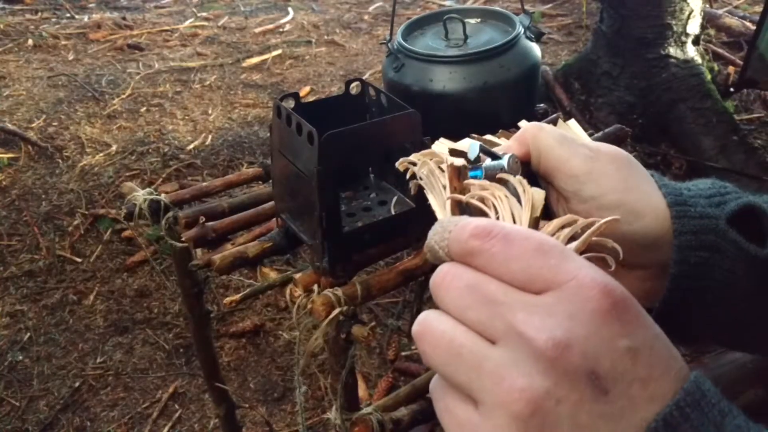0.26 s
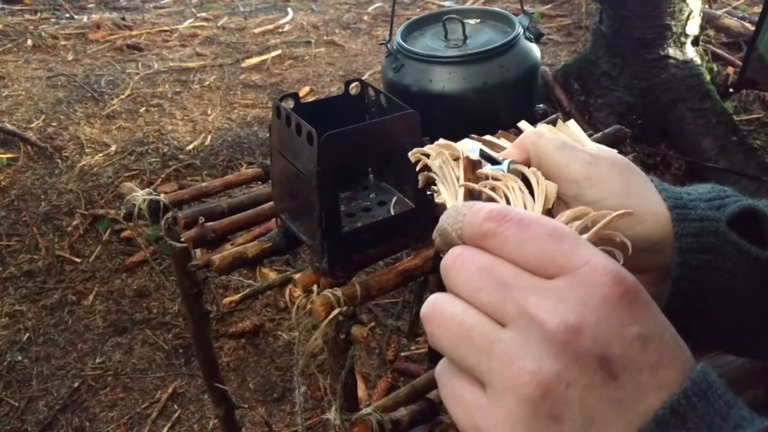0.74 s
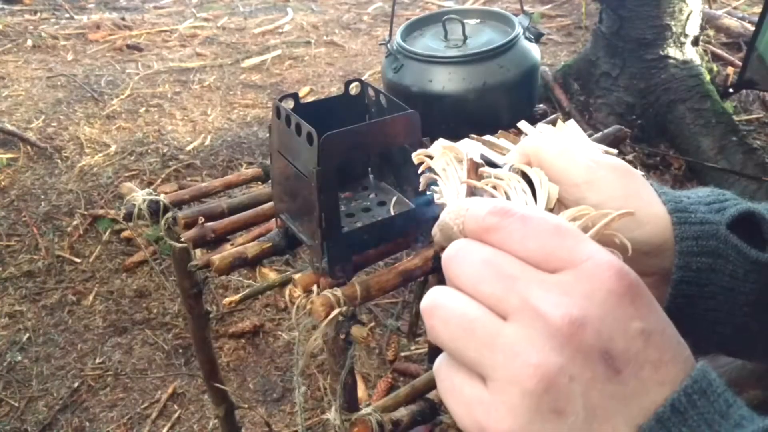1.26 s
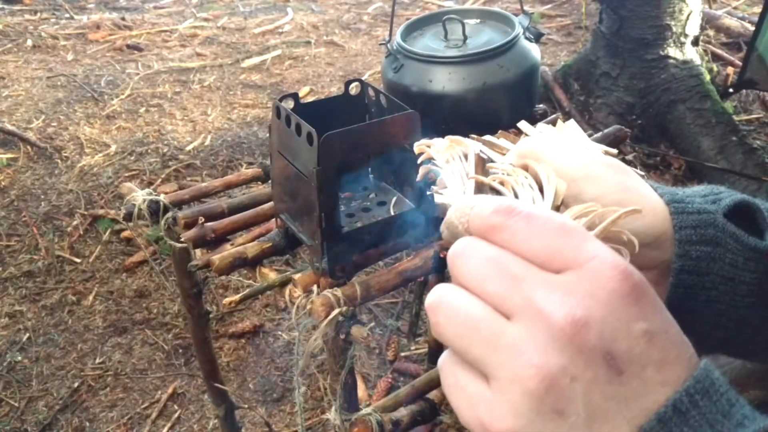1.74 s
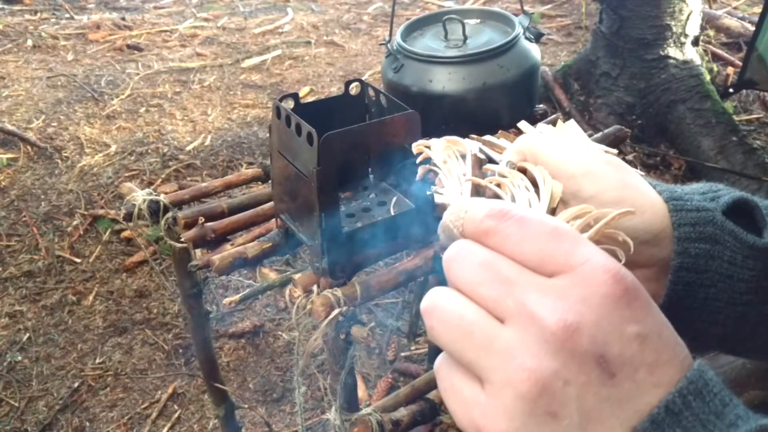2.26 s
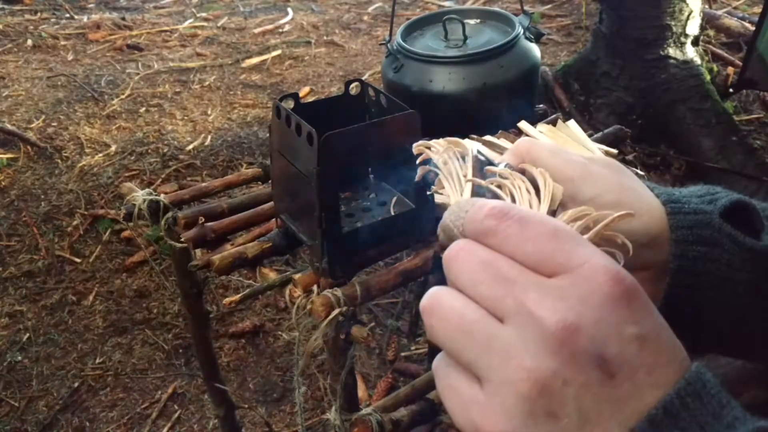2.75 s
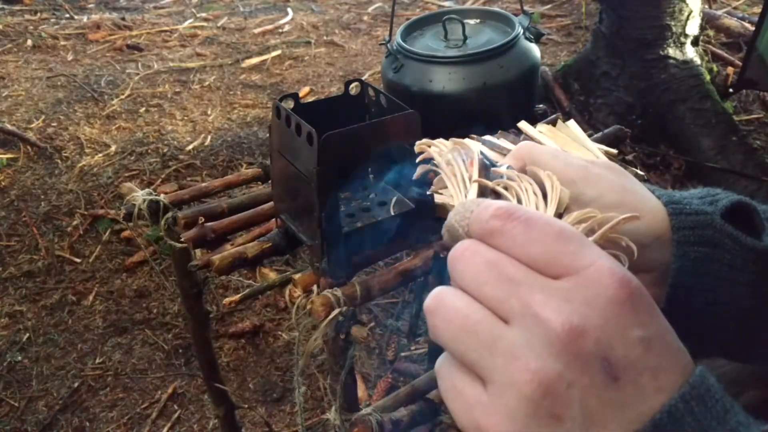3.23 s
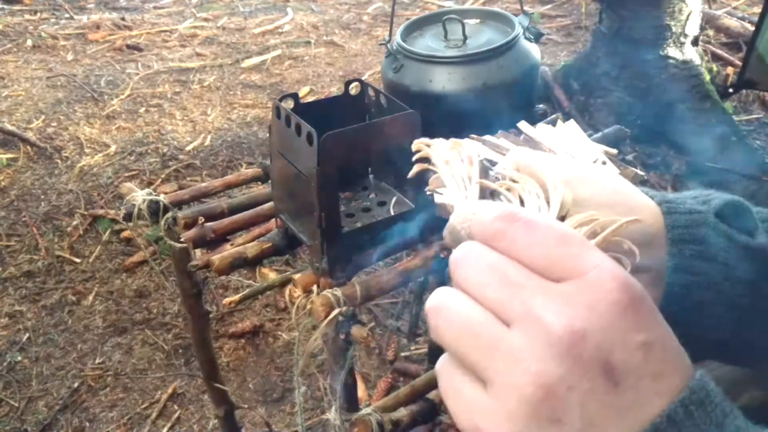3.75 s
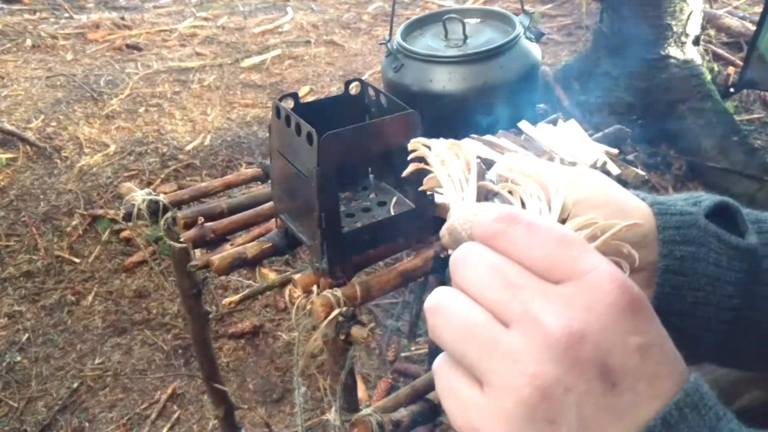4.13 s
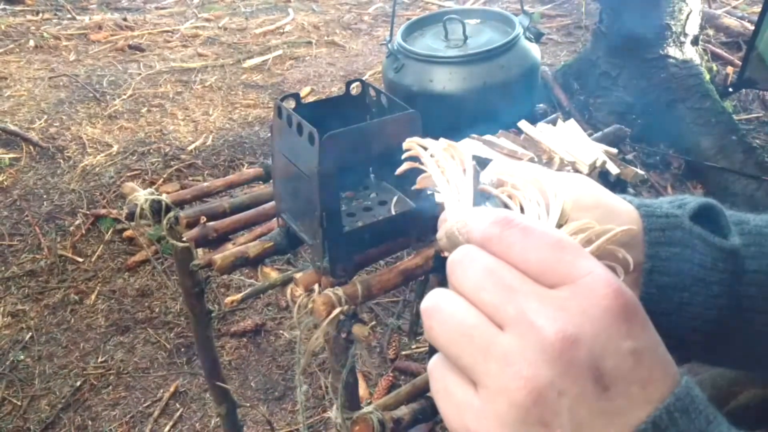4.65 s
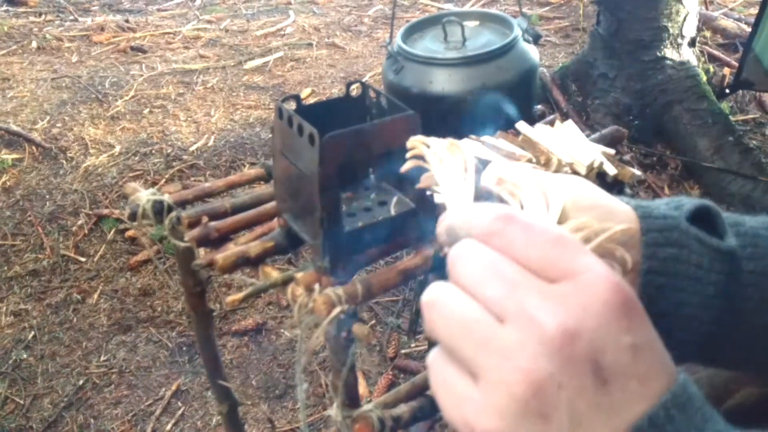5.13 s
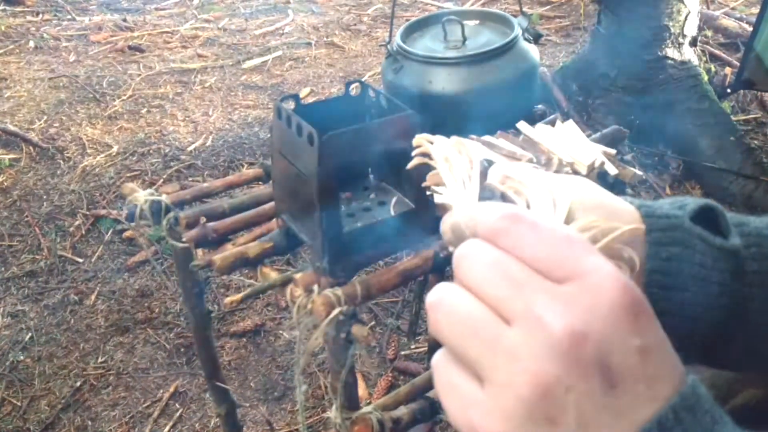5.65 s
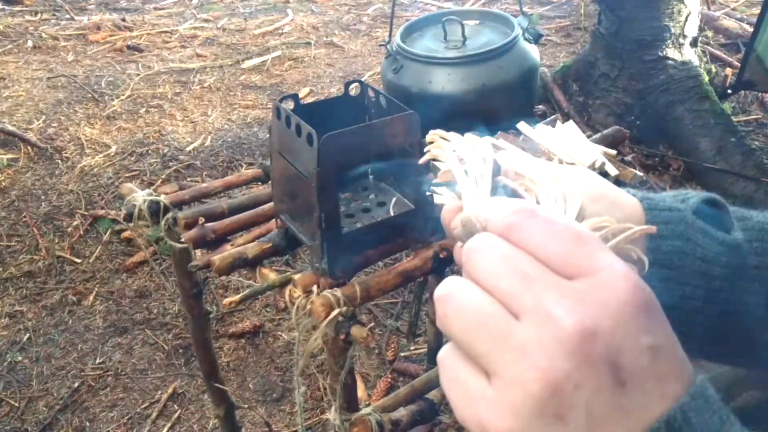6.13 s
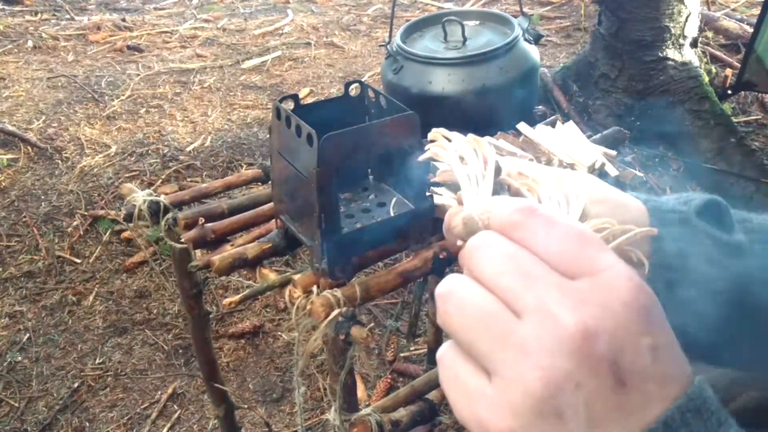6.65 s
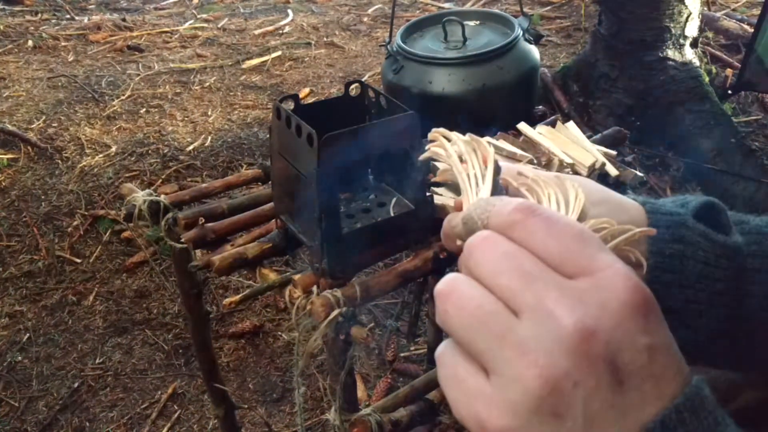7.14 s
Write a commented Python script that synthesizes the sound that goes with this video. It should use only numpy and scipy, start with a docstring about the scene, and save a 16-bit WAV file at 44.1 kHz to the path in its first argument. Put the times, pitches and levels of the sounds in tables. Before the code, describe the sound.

A quiet burning rush fades in as a gas flame meets a handful of moist shavings, then stays nearly even. Steam hisses and spits faintly over the breathy roar. Dry curls tick brightly and steam pockets pop with short hollow knocks, busiest from two to five seconds, sparse afterwards, until one prominent crack at the very end. Close microphones outdoors, wide image, little echo.

```python
"""A jet lighter's flame roars on a bunch of damp wood shavings, outdoors: filtered noise, fading in to about 2.5 s.
Steam pockets pop as pulses that ring the wood, each with a bright crack; thin curls tick as short noise splits.
Gas and steam hiss as reflected noise, and moisture sizzles as flurries of tiny noise spits.
Two close microphone ports hear it; each channel is one port minus the other, delayed, which spreads it wide."""
import sys
import numpy as np
from scipy import signal
from scipy.fft import rfft, irfft, next_fast_len
from scipy.io import wavfile
from scipy.ndimage import uniform_filter1d

SR = 44100
rng = np.random.default_rng(int(sys.argv[2]) if len(sys.argv) > 2 else 0)


def digitize_waveform(pressure):
    """Quantize a signal to 16-bit integers and store it at the path in sys.argv[1].

    Rows of a 2-D input are taken as channels; values are limited to [-1, 1].
    """
    field = np.atleast_2d(pressure).T
    bounded = np.clip(field, -1, 1)
    quanta = np.round(bounded * 32767).astype(np.int16)
    wavfile.write(sys.argv[1], SR, quanta)


N = 325899
BURST = 4096  # samples in a short sound
SCATTER_T60_S = .06

# share of the left port's direct sound that the right port hears alike, capped in use: hz, share (0-1)
ROAR_SHARE = [(100, 1), (300, 0.64), (450, 0.44), (850, 0.78), (1300, 0.63), (1700, 0.02), (8000, 0.19)]


def roar(flame_db):
    """Turbulent burning where the jet meets the shavings; it flutters as the flame licks round them."""
    # colour: hz, relative_db
    roar_colour = [(22, -18), (60, -6.5), (85, -7), (130, -5), (240, -5), (350, -3), (455, -10),
                   (560, -2.5), (690, -3.5), (820, 1), (1050, -3.5), (1520, -7), (1750, -11.5),
                   (2080, -11.5), (2300, -20.5), (3000, -20), (6000, -60)]
    # treble gain, duller for a while: time_s, gain_db
    treble_db = [(0, 0.5), (3.0, -0.5), (4.5, -0.5), (5.3, -0.5), (6.0, -2), (6.6, -1.5), (7.1, .5)]
    treble_edge_hz = 1600
    flutter = undb(0.57 * walk(9.9) + 0.58 * walk(70))
    direct, scattered = rng.standard_normal((2, N)) * flutter
    flame = ports(direct, scattered, roar_colour, ROAR_SHARE, stray=0.56, late_s=.00005)
    high_pass = signal.butter(2, treble_edge_hz, "high", fs=SR, output="sos")
    treble = signal.sosfiltfilt(high_pass, flame)
    shaded = flame + (undb(over_time(treble_db)) - 1) * treble
    return level(shaded, 0.24) * undb(flame_db + 0.47)


def pops(echo_s=.0045, echo=0.19, note_t60_s=0.0047, crack_late_s=0.00033):
    """A bursting steam pocket is a pressure pulse that rings the wood, then a crack; stove and ground throw some back."""
    # steam pockets, both levels before gain_db: start_s, thump_db, thump_hz, ring (0-1),
    # note_hz (lowest of the wood), crack_db, crack_hz
    pockets = [(0.612, -57.5, 634, 0, 300, -61.5, 5550), (1.2847, -53, 1010, 0.1, 430, -74, 3600),
               (1.445, -60, 900, 0, 380, -68, 3600), (1.6156, -47, 810, 0.24, 350, -59, 3870),
               (1.8162, -45.5, 980, 0.6, 400, -49.5, 3420), (1.923, -45, 1150, 0.35, 490, -48, 3370),
               (2.031, -37.5, 586, .1, 240, -48.5, 3700), (2.1222, -46.5, 1180, .15, 490, -60, 3200),
               (2.5155, -43, 690, 0.2, 290, -53.5, 4630), (3.2052, -43.5, 1210, 0.4, 520, -53, 3970),
               (3.385, -45, 1200, 0.3, 480, -66, 3800), (3.9858, -32.5, 580, 0.75, 328, -41.5, 3800),
               (4.2947, -27.5, 800, 0.14, 443, -38.5, 4250), (4.584, -44.5, 950, 0, 400, -59, 3600),
               (4.8377, -43, 825, 0.6, 340, -53, 3500), (4.8457, -39, 1110, 0, 480, -51, 3600),
               (5.0425, -53, 1300, 0, 550, -51, 3280), (5.1146, -47, 1300, 0, 550, -55, 3500),
               (5.255, -46, 1260, 0.3, 530, -53.5, 3500), (7.0527, -37.5, 1040, 0.3, 365, -43, 3020),
               (7.0839, -44.5, 1430, .05, 600, -51, 3900), (7.0926, -48, 1150, 0.3, 490, -60, 3900),
               (7.099, -48, 1150, 0.6, 490, -50.5, 3880), (7.226, -42.5, 1430, 0, 600, -46.5, 3800),
               (7.2525, -19, 696, 0.1, 620, -27.5, 3610)]
    # thump colour: multiple of thump_hz, relative_db
    thump_colour = [(.02, -73), (.07, -68), (.17, -10.5), (.32, 1), (.8, 3), (1.35, 3), (1.8, -4),
                    (2.6, -10), (4, -33.5), (10, -73)]
    # crack colour: multiple of crack_hz, relative_db
    crack_colour = [(.03, -42), (.33, -15), (0.621, 3), (.82, -1.5), (1, -0.5), (1.2, -5.5), (1.45, -7),
                    (1.8, -7), (2.3, -13), (3.1, -22.5), (4.2, -22)]
    # share the right port hears alike, capped in use: hz, share (0-1)
    pop_share = [(200, 1), (700, 0.36), (1400, 0.096), (2200, 0.21), (8000, 0.056)]
    gain_db = .5
    out = np.zeros((2, N))
    t = np.arange(BURST) / SR
    pulse = signal.unit_impulse(BURST)

    def thrown_back(x):
        """Delay a burst by its path to the surfaces and back."""
        return np.pad(x, (int(echo_s * SR), 0))[:BURST]

    for start_s, thump_db, thump_hz, ring, note_hz, crack_db, crack_hz in pockets:
        push = pulse + ring * stick(note_hz)
        push = push + thrown_back(echo * pulse + 0.28 * dying(0.038))
        colour = [(multiple * thump_hz, db) for multiple, db in thump_colour]
        thump = ports(push, dying(0.052), colour, pop_share, stray=0.13, late_s=-0.00011)

        note = np.cos(2 * np.pi * crack_hz * t) * undb(-60 * t / note_t60_s)
        split = 0.8 * pulse + 0.06 * note + 0.6 * splinters(spread_s=0.0064, size=.5)
        split = split + 0.45 * thrown_back(dying(0.05))
        colour = [(multiple * crack_hz, db) for multiple, db in crack_colour]
        crack = ports(split, dying(SCATTER_T60_S), colour, pop_share, stray=0.45)

        add(out, start_s, thump, thump_db + gain_db)
        add(out, start_s + crack_late_s, crack, crack_db + gain_db)
    return out


def stick(note_hz):
    """The bending modes of a sliver of wood after a blow; higher modes are weighted up by their frequency."""
    # modes: multiple of note_hz, level_db before that weighting, t60_s
    modes = [(1, -5, 0.045), (2.55, -7.5, 0.023), (4.8, -17.5, 0.05)]
    t = np.arange(BURST) / SR
    ringing = np.zeros(BURST)
    for multiple, db, t60_s in modes:
        turn = 2 * np.pi * note_hz * multiple  # rad/s
        ringing += np.cos(turn * t) * undb(db - 60 * t / t60_s) * turn / SR
    return ringing


def ticks(snaps, skirt_db=-8, ring_t60_s=0.0051, gain_db=1.6):
    """A curl snaps cleanly or crumbles for some milliseconds, rings at its own pitch and scatters among the others."""
    out = np.zeros((2, N))
    t = np.arange(BURST) / SR
    for start_s, db, hz, crumbling in snaps:
        colour = [(hz / 8, -28), (hz / 3, -13), (hz / 1.8, -3), (hz, 0), (hz * 2, skirt_db)]
        ring = np.sin(2 * np.pi * hz * t) * undb(-60 * t / ring_t60_s)
        split = splinters(spread_s=0.011, size=crumbling) + 0.15 * ring
        split = split + 2.9 * crumbling * dying(SCATTER_T60_S)
        tick = ports(split, dying(SCATTER_T60_S), colour, ROAR_SHARE, stray=0.4)
        add(out, start_s, tick, db + gain_db)
    return out


def faint_ticks(hiss_db, count=60):
    """Finer curls snap at random, a little above the hiss: rows of start_s, level_db, centre_hz, crumbling."""
    ticks_per_s = 3
    above_hiss_db, spread_db = 1, 2  # before the gain in ticks()
    centre_hz, spread_octaves = 7000, 0.61
    when, chance, size, pitch, crumbling = rng.random((count, 5)).T
    at = (when * N).astype(int)
    db = hiss_db[at] + above_hiss_db + spread_db * (2 * size - 1)
    hz = centre_hz * 2 ** (spread_octaves * (2 * pitch - 1))
    kept = chance < ticks_per_s * N / SR / count
    return np.column_stack([at / SR, db, hz, crumbling])[kept]


def splinters(spread_s, size, count=3):
    """A split followed by a few smaller ones as neighbouring fibres give way."""
    burst = dying(0.0044)
    for wait, share in rng.random((count, 2)):
        k = int(wait * spread_s * SR)
        burst[k:] += size * share * dying(0.0033)[:BURST - k]
    return burst


def hiss(hiss_db):
    """Gas from the nozzle and steam from the wood: an even rush of noise."""
    # colour: hz, relative_db
    hiss_colour = [(1200, -8), (2300, -3), (3600, 0.5), (4100, -2), (4700, -1), (6400, -3.5), (8200, -3),
                   (10700, -6), (11280, -6.5), (11800, -7.5), (13000, -8.5), (15300, -9.5)]
    direct, scattered = rng.standard_normal((2, N)) * undb(.5 * walk(21.58))
    rush = ports(reflected(direct), reflected(scattered), hiss_colour, ROAR_SHARE, stray=1.0)
    return level(rush, -0.62) * undb(hiss_db)


def reflected(x):
    """Hands, stove and ground throw the jet's sound back; the ripple in its colour drifts as the hands sway."""
    # reflections: delay_s (before sway), share (0-1)
    reflections = [(.00115, 0), (.0029, .14), (.0045, 0.2)]
    sway_s, sway_per_s = .00002, .8
    n = np.arange(N)
    out = x.copy()
    for delay_s, share in reflections:
        swaying_s = delay_s + sway_s * walk(sway_per_s)
        out += share * np.interp(n - swaying_s * SR, n, x)
    return out


def sizzle(hiss_db, base_rate_per_s=70, spread_db=3.5, t60_s=0.016, flurry_db=5):
    """Moisture boiling out of the fibres: flurries of tiny spits of uneven size."""
    sizes = undb(spread_db * np.minimum(rng.exponential(size=N), 3))
    chance = base_rate_per_s / SR * undb(flurry_db * walk(12))
    spits = (rng.random(N) < chance) * sizes
    envelope = signal.lfilter([1], [1, -undb(-60 / SR / t60_s)], spits)
    direct, scattered = rng.standard_normal((2, N)) * envelope
    colour = [(1200, -2), (3200, 6.5), (8000, -8), (11500, 4.5), (15000, -1.5)]  # hz, relative_db
    return level(ports(direct, scattered, colour, ROAR_SHARE, stray=0.32), -10.5) * undb(hiss_db)


def ports(direct, scattered, colour, share, stray, late_s=0.):
    """Port differences: the right port hears a share of the direct sound, late_s later, plus stray scatter."""
    # how much of each port is taken from the other: hz, share (0-1)
    cross_feed = [(5400, 1), (6400, .55), (7600, .72), (8900, .82), (10000, .92), (11300, .62),
                  (12500, .42), (14000, .2)]
    # delay of the sound taken from the other port: hz, delay_s
    port_lag = [(1200, .0004), (3700, .000403), (8900, .000393), (11200, .000402), (15000, .000399)]
    size = 2 * next_fast_len(len(direct) // 2 + 1)
    hz = bins(size)
    left = rfft(direct, size)
    alike = np.clip(along(share, hz), 0, .9) * np.exp(-2j * np.pi * hz * late_s)
    right = alike * left + stray * rfft(scattered, size)
    feed = along(cross_feed, hz) * np.exp(-2j * np.pi * hz * along(port_lag, hz))
    # the subtraction thins the bass, so it is equalised back to flat
    direct_power = abs(1 - alike * feed) ** 2 + abs(alike - feed) ** 2
    power = direct_power + stray ** 2 * (1 + abs(feed) ** 2)
    pair = np.array([left - feed * right, right - feed * left]) / np.sqrt(power)
    return irfft(pair * causal(along(colour, hz)))[:, :len(direct)]


def causal(db):
    """The minimum-phase filter with these gains: a sharp front, ringing after it."""
    cepstrum = irfft(np.log(undb(db)))
    half = len(cepstrum) // 2
    cepstrum[1:half] *= 2
    cepstrum[half + 1:] = 0
    return np.exp(rfft(cepstrum))


def dying(t60_s):
    """A burst of noise that dies away, with unit energy."""
    x = rng.standard_normal(BURST) * undb(-60 * np.arange(BURST) / SR / t60_s)
    return x / np.linalg.norm(x)


def walk(rate_per_s):
    """Random levels held 1 / rate_per_s and smoothed twice; spread near 1."""
    k = max(int(SR / rate_per_s), 1)
    held = np.repeat(rng.standard_normal(N // k + 1), k)
    return 1.35 * uniform_filter1d(uniform_filter1d(held, k), k)[:N]


def add(out, start_s, burst, db):
    """Mix in a short sound, its energy referred to a 5 ms event."""
    event_s = .005
    start = max(int(start_s * SR), 0)
    burst = level(burst, db) * np.sqrt(event_s * SR / BURST)
    out[:, start:start + BURST] += burst[:, :N - start]


def level(x, db):
    """Set the rms level."""
    return x * undb(db) / np.sqrt(np.mean(x ** 2))


def undb(db):
    """Decibels to gain."""
    return 10 ** (np.asarray(db) / 20)


def bins(size):
    """Frequencies in Hz of a spectrum of that many samples, at least 1."""
    return np.maximum(np.arange(size // 2 + 1) * SR / size, 1)


def along(points, hz):
    """Read (hz, value) points on a log-frequency axis."""
    at, value = np.transpose(points)
    return np.interp(np.log(hz), np.log(at), value)


def over_time(points):
    """Read (time_s, value) points at every sample."""
    return np.interp(np.arange(N) / SR, *np.transpose(points))


def scene():
    """One level curve drives roar and steam, which joins the nozzle's steady hiss; pops and ticks sit on top."""
    # the sound fades in until about 2.5 s, then stays nearly even: time_s, level_db
    flame_level = [(0.0, -73), (0.12, -70.5), (0.84, -66), (2.158, -52), (2.51, -49.5), (2.86, -50),
                   (4.09, -51), (5.04, -50.5), (5.619, -50.5), (5.72, -52), (6.01, -52), (6.73, -51.5),
                   (7.02, -49.5), (7.39, -51.5)]
    # steam from the wood, relative to the flame's level: time_s, relative_db
    steam_level = [(0, -7), (2.0, -9.5), (3.8, -9.5), (5.2, -9.5), (5.9, -10), (6.5, -9.5), (6.9, -8)]
    # curls snapping in the heat: start_s, level_db (before the gain in ticks), centre_hz, crumbling (0-1)
    curl_snaps = [(0.213, -69, 11000, .3), (0.2933, -66, 6000, 0.7), (0.8884, -52, 7000, 0.27),
                  (1.3565, -61, 6500, 0.9), (1.882, -59, 8600, .6), (2.1935, -53.5, 4850, 0.5),
                  (2.2345, -60, 11700, 0.8), (2.2675, -57, 3620, 0.2), (2.4391, -44.5, 7100, 0.4),
                  (2.446, -57, 4400, .8), (2.6162, -51, 5450, .4), (2.6684, -55, 9050, 0),
                  (2.683, -54.5, 5000, 0.8), (3.0698, -47, 9400, 0.6), (3.3829, -50, 9800, 0.4),
                  (3.4115, -57, 8500, .5), (3.5458, -51, 8100, 0.4), (3.843, -53, 5030, 0.7),
                  (3.9898, -45.5, 4730, 1.), (4.0762, -51.5, 6100, 0.8), (4.1106, -47, 12100, 0.1),
                  (4.2639, -48.5, 6170, 0.8), (4.4955, -44, 4830, 0.3), (4.5055, -48, 3960, 0.6),
                  (4.5457, -44.5, 4940, 0.2), (4.6195, -50.5, 6800, 0.4), (4.6704, -51, 5940, 0.1),
                  (4.7662, -56, 6550, 0.6), (4.8013, -41.5, 11000, 0.25), (4.8878, -50.5, 7300, 0.4),
                  (5.116, -55, 8800, .4), (5.177, -53.5, 5200, .8), (5.3902, -61, 6800, .4),
                  (5.4631, -55, 7250, .6), (6.3243, -50, 11100, 0.3), (6.3912, -55, 8440, 0.3),
                  (6.6455, -56, 8600, 0.2), (6.7337, -53, 8900, 0.7), (6.7578, -46.5, 8450, 1),
                  (6.8051, -51, 12000, .4), (7.077, -56, 3900, 0.1), (7.1788, -58, 4000, .8),
                  (7.194, -62, 5960, .5)]
    nozzle_db = -77  # the gas jet alone
    flame_db = over_time(flame_level)
    steam_db = flame_db + over_time(steam_level)
    hiss_db = 20 * np.log10(np.hypot(undb(nozzle_db), undb(steam_db)))
    burning = roar(flame_db) + hiss(hiss_db) + sizzle(hiss_db)
    return burning + pops() + ticks(curl_snaps) + ticks(faint_ticks(hiss_db))


def record(dry):
    """The two channels differ a little in colour; the top is cut."""
    # the left channel's lead over the right: hz, lead_db
    balance = [(120, 3.5), (380, 2.5), (700, -1), (1300, 0.5), (1800, -.5), (2500, 0), (3000, 2), (3700, 0),
               (5000, 1.5), (6400, 1.8), (10000, .9), (13000, 1)]
    top_hz = 15500
    size = next_fast_len(N + BURST, True)
    size += size % 2
    lead_db = along(balance, bins(size))
    gains = undb(np.array([lead_db, -lead_db]) / 2)
    wet = irfft(rfft(dry, size) * gains)[:, :N]
    low_pass = signal.ellip(10, .2, 70, top_hz, fs=SR, output="sos")
    return signal.sosfilt(low_pass, wet)


dry = scene()
out = record(dry)
digitize_waveform(out)
```